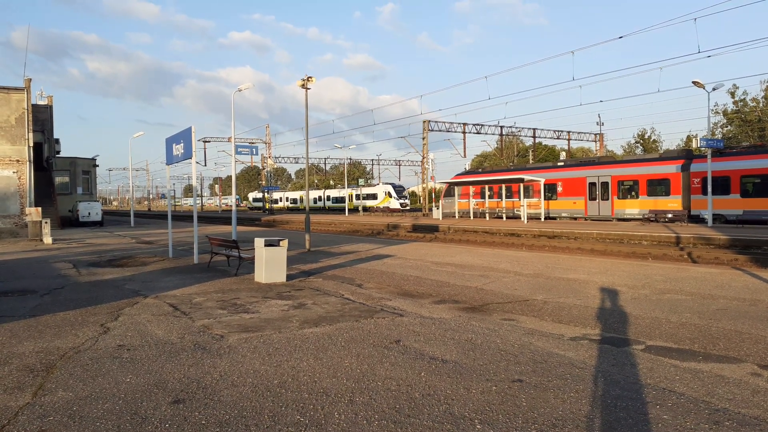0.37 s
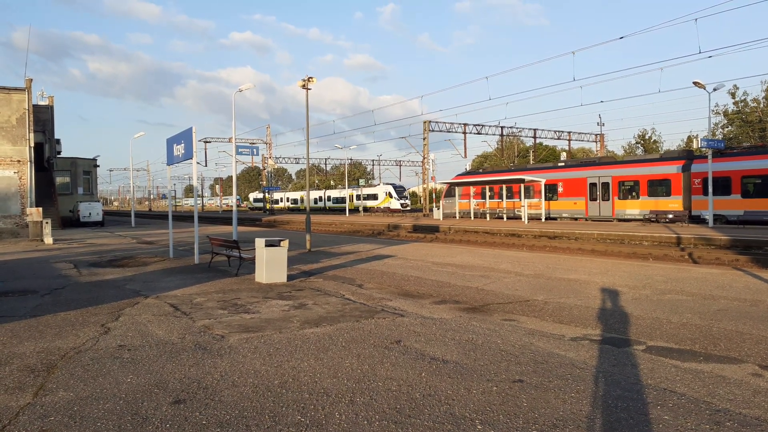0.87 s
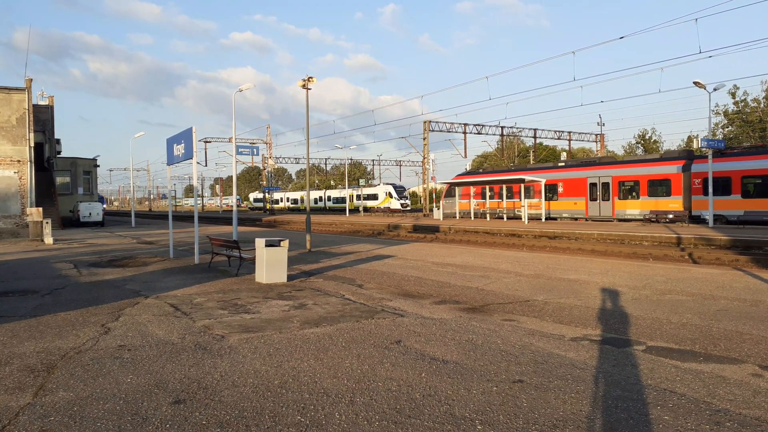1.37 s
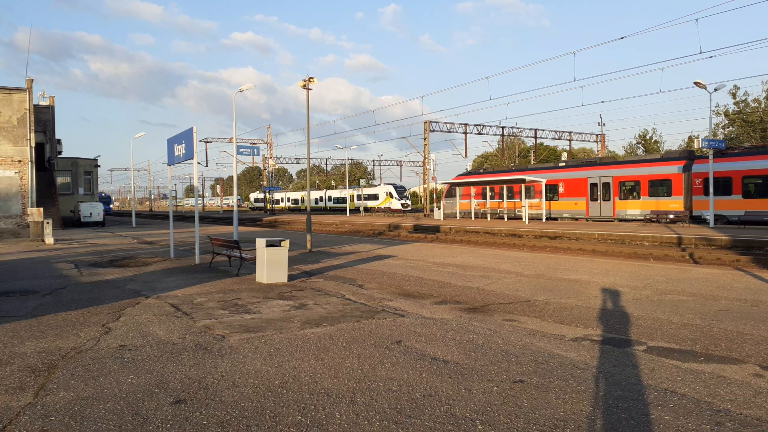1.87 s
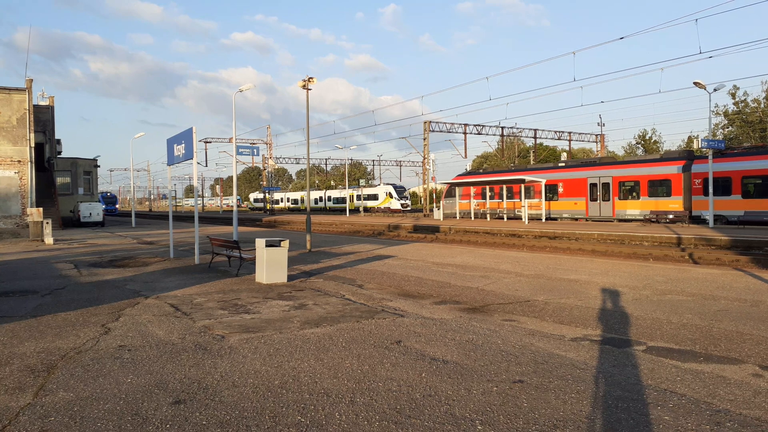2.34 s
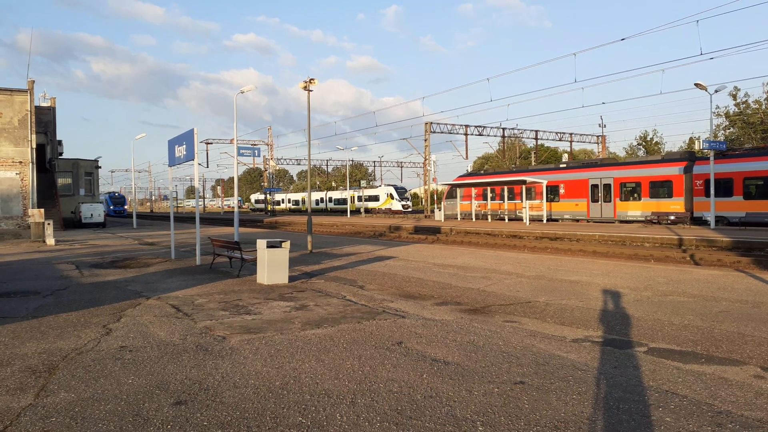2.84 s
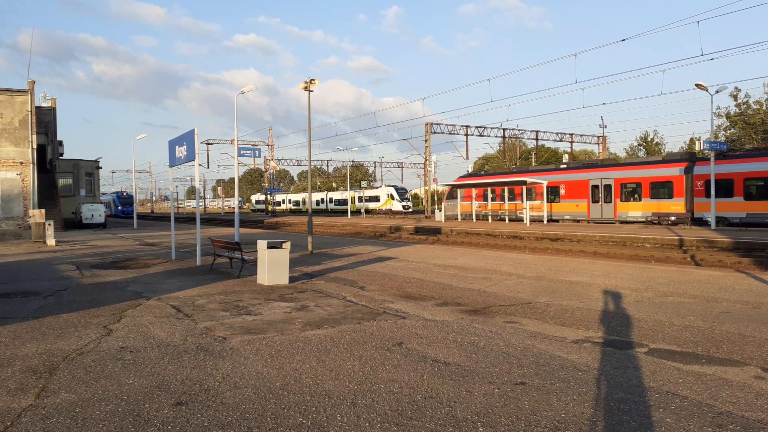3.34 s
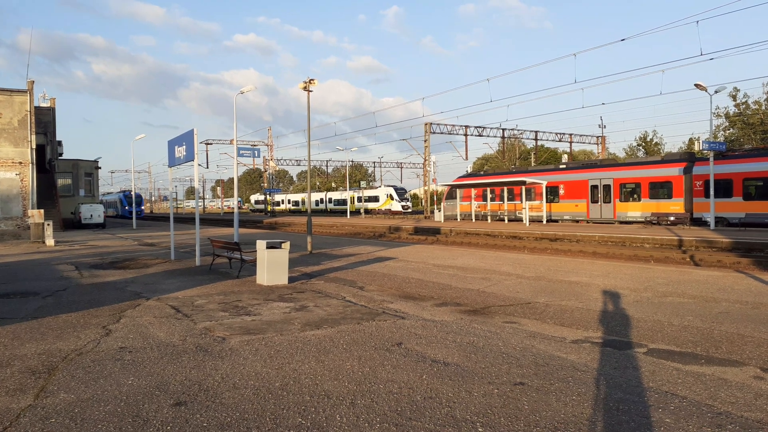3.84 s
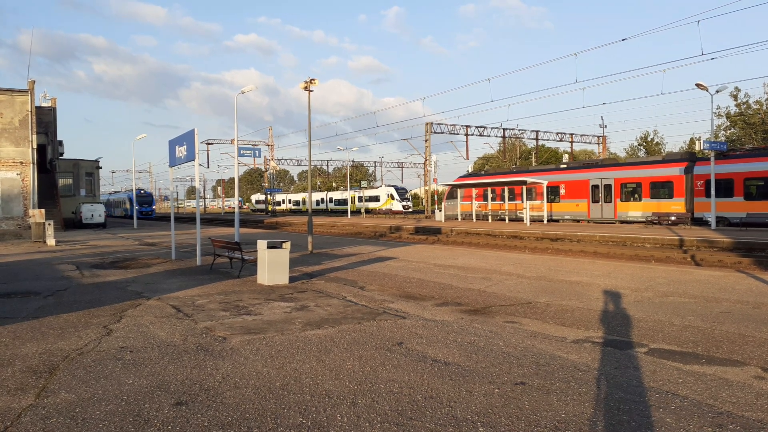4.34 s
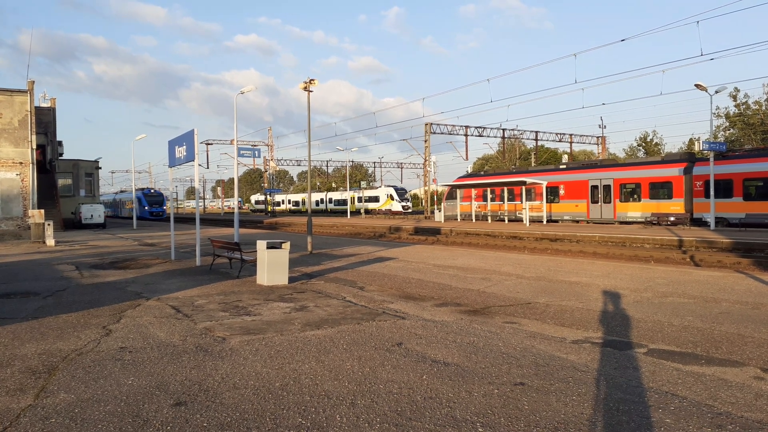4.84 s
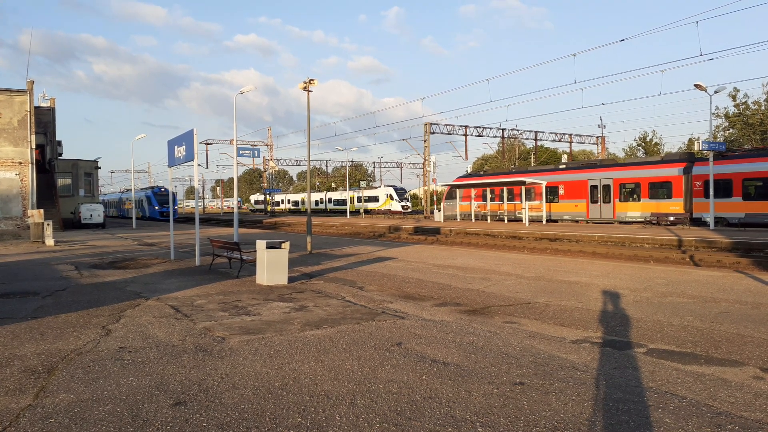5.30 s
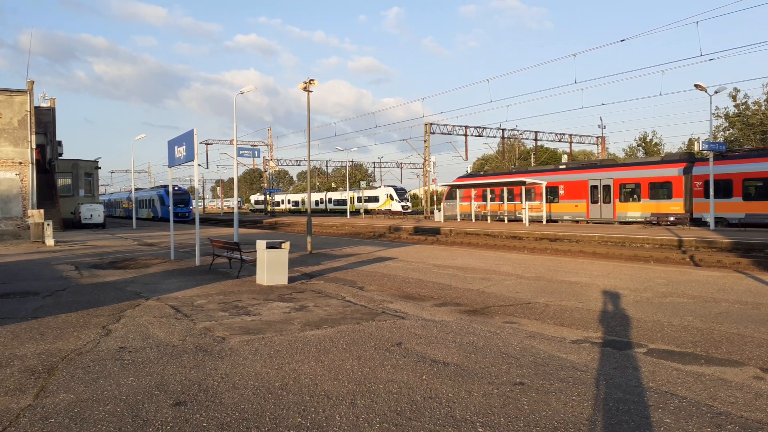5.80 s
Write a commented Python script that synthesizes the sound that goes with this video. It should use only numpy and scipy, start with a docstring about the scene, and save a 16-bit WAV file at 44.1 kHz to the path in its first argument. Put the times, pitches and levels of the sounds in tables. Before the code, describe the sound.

Swifts scream in buzzing trills over a windy station yard while a standing train hums and another brakes in the distance with a sinking whine.

```python
"""Swifts over a station yard

A standing train hums and its fans hiss on the right: wavering tone over banded noise. Another rolls in far off,
braking: a sinking, ever rougher motor whine over dull wheel noise. Gusts buffet the two microphone ports as low
turbulence and single wobbles. Small birds chip on the left in quick glides, with one longer rising swift call
near the end; a few dry ticks fall. Swifts scream overhead: buzzing whistles that break into trills, with echoes."""
import sys
import numpy as np
from scipy import signal
from scipy.io import wavfile

SR = 44100
rng = np.random.default_rng(int(sys.argv[2]) if len(sys.argv) > 2 else 0)


def pcm_store(signal):
    """Save signal as 16-bit PCM."""
    levels = np.round(np.clip(np.atleast_2d(signal), -1, 1) * 32767)
    wavfile.write(sys.argv[1], SR, levels.astype(np.int16).T)


N = 272538
STANDING_LAG_S = .00043   # the left port hears the standing train later


def from_db(db):
    """dB to gain."""
    return 10 ** (np.asarray(db) / 20)


def rms_one(x):
    """Scale to rms 1."""
    return x / np.sqrt(np.mean(x ** 2) + 1e-20)


def in_time(rows):
    """Columns of a curve table at every sample."""
    s, *columns = np.transpose(rows)
    return [np.interp(np.arange(N) / SR, s, c) for c in columns]


def at_hz(points, hz):
    """Read a spectrum on a log-frequency axis."""
    point_hz, value = np.transpose(points)
    return np.interp(np.log(hz), np.log(point_hz), value)


def band(x, low_hz, high_hz):
    """Butterworth band-pass."""
    return signal.sosfilt(signal.butter(2, [low_hz, high_hz], "band", fs=SR, output="sos"), x)


def drift(rate_hz):
    """Slow chance of spread 1: coarse noise twice through a one-pole low-pass."""
    r = np.exp(-80 * np.pi * rate_hz / SR)   # one coarse step is 40 samples
    slow = signal.lfilter([1], [1, -2 * r, r * r], rng.standard_normal(N // 40 + 2002))[2000:]
    return np.interp(np.arange(N) / 40, np.arange(len(slow)), rms_one(slow))


def sides(x, pan_db, lag_s=0):
    """Place sound between the ports: a level tilt, and the left one reading late."""
    x, n = x * np.ones((2, 1)), np.arange(N)
    left = np.interp(n - lag_s * SR, n, x[0])
    return np.array([left * from_db(pan_db / 2), x[1] * from_db(-pan_db / 2)])


def banded_noise(spectrum, likeness, edges, together_db, patchy_db, rate_hz):
    """Bands of stereo noise, each with its own level, flicker and likeness."""
    out = 0
    together = np.array([drift(rate_hz), drift(rate_hz)])   # one for each port
    white = rng.standard_normal((2, 2, N))
    for k, (low_hz, high_hz) in enumerate(zip(edges, edges[1:])):
        mid, side = band(white[k % 2], low_hz, high_hz)   # neighbouring bands use different noise
        hz = np.sqrt(low_hz * high_hz)
        alike = np.clip(at_hz(likeness, hz), 0, 1)
        pair = np.sqrt(1 + alike) * mid + np.sqrt(1 - alike) * side * [[1], [-1]]
        level_db = at_hz(spectrum, hz) + together_db * together + patchy_db * drift(rate_hz)
        out = out + from_db(level_db) * pair
    return out


def wavering(hz, width_hz, rough):
    """A tone whose steadiness is blurred by slow chance in level and phase; rms about 1 while rough is small."""
    turn = 2 * np.pi * np.cumsum(hz) / SR
    steady = (np.sqrt(2) + rough * drift(width_hz)) * np.sin(turn)
    return steady + rough * drift(width_hz) * np.cos(turn)


def walls(x):
    """Scattered echoes off buildings and carriages, other ones at each port."""
    out = np.zeros((2, N))
    lags = (rng.uniform(0.0019, 0.15, 28) * SR).astype(int)
    for k, lag in enumerate(lags):
        out[k % 2, lag:] += from_db(-170 * lag / SR) * x[:N - lag]   # later echoes are weaker, 170 dB per s
    return out


# Yard noise over time. Each row: time in seconds, level in dB before a half-dB lift, left minus right in dB.
YARD = [(0, -50, -2), (2.1, -50.5, -3.5), (2.5, -55.5, -1), (4.0, -51.5, -0.4), (5.2, -52, -0.8),
        (6.18, -49, 0)]
# Tone colour of the yard. Each row: frequency in Hz, relative density in dB per Hz.
YARD_COLOUR = [(35, -16), (60, -14), (140, -12), (300, -10.5), (450, -15), (800, -27.5), (1100, -25.5),
               (1400, -31), (2100, -33.5), (2750, -41.5), (3600, -44), (5200, -45), (7000, -56),
               (8500, -57), (10500, -69), (15700, -65)]
# How alike the ports hear the yard. Each row: frequency in Hz, likeness from 0 to 1.
YARD_LIKENESS = [(100, 1), (2000, 0.23), (12000, 0.05)]


def yard():
    """Fans, vents and far traffic: smooth broad noise, levelled on its middle band."""
    level_db, pan_db = in_time(YARD)
    edges_hz = 28.4 * 2 ** np.arange(0, 9.3, .4)
    noise = banded_noise(YARD_COLOUR, YARD_LIKENESS, edges_hz, together_db=0.8, patchy_db=1.6, rate_hz=10.8)
    noise = noise / np.std(band(noise, 1400, 3500))
    return sides(from_db(level_db + 0.5) * noise, pan_db, STANDING_LAG_S)


# Level of the hum. Each row: time in seconds, level in dB before the slight tilt to the right.
HUM = [(0, -35.5), (1.0, -33.5), (1.65, -38), (2.1, -35.5), (3.45, -39), (4.1, -34.5), (5.25, -39),
       (5.85, -34), (6.18, -35.5)]


def hum():
    """A converter hum of the standing train: one low tone, slightly unsteady."""
    tone = wavering(np.full(N, 324.5), width_hz=7.0, rough=.25)
    return sides(from_db(in_time(HUM)[0]) * tone, -1.0, STANDING_LAG_S)


# Wind beneath the gusts, rising over the first second and then holding. Each row: time in seconds,
# left level in dB, right level in dB.
BREEZE = [(0, -75, -52), (1.2, -35.5, -34.5), (3.0, -34.5, -34), (6.18, -35.5, -33.5)]
# Gusts on the ports. Each row: start of the hold in seconds, hold in seconds, left level in dB, right level in dB.
GUSTS = [(1.313, 0.29, -19.5, -34), (1.698, 0.15, -27, -39), (1.909, 0.04, -23.5, -22.5),
         (2.051, 0.15, -16.5, -42), (2.247, 0.035, -25, -16), (3.56, 0.076, -27, -23),
         (3.719, 0.011, -25.5, -18.5), (3.818, 0.17, -28, -29), (4.235, 0.068, -24, -22.5),
         (4.395, 0.039, -26.5, -33), (5.122, 0.022, -28, -26.5), (5.653, 0.054, -27, -26.5),
         (5.875, 0.014, -26.5, -22.5)]


def wind_db():
    """The breeze, overtopped by gusts that rise fast, hold and fall."""
    rise_db_per_s, fall_db_per_s = 403.5, 254
    t, level_db = np.arange(N) / SR, np.array(in_time(BREEZE))
    for s, hold_s, left_db, right_db in GUSTS:
        before_s, after_s = np.maximum(s - t, 0), np.maximum(t - s - hold_s, 0)
        under_db = rise_db_per_s * before_s + fall_db_per_s * after_s
        level_db = np.maximum(level_db, np.array([[left_db], [right_db]]) - under_db)
    return level_db


# Tone colour of the turbulence. Each row: frequency in Hz, relative density in dB per Hz.
WIND_COLOUR = [(35, -13), (70, -4.5), (105, 0.5), (150, -7.5), (340, -10.5), (500, -36)]
# Single puffs on the ports. Each row: centre in seconds, left drive in dB, right drive in dB, spread in ms,
# wobble in Hz.
PUFFS = [(1.917, -12.5, -49, 0.54, 367), (2.181, -9.5, -35, 0.48, 400), (2.208, 2.5, -54, 0.94, 375),
         (3.35, -50, -12, 1, 416), (3.62, -18.5, -22, 9.0, 330), (3.665, -22.5, -23.5, 6.4, 327),
         (3.72, -14.5, -14, 3.8, 300), (3.843, -17, -29, 7.4, 341), (4.27, -8, -15, 6.1, 349.5),
         (4.311, -20, -19, 6.2, 316)]


def wind():
    """Lumpy low turbulence, mostly its own at each port, plus single eddies that make a port wobble."""
    edges_hz = 30 * 2 ** np.arange(0, 4.1, .33)
    lumps = banded_noise(WIND_COLOUR, [(50, 0.16)], edges_hz, together_db=2.5, patchy_db=4.0, rate_hz=19.5)
    lumps = signal.sosfilt(signal.butter(6, 470, fs=SR, output="sos"), lumps)
    out = from_db(wind_db()) * rms_one(lumps)
    t = np.arange(-1000, 1000) / SR
    soften = signal.butter(4, 1100, fs=SR, output="sos")
    for s, left_db, right_db, spread_ms, hz in PUFFS:
        swell = np.exp(-np.abs(1000 * t / spread_ms) ** 1.4)
        wobble = swell * np.sin(2 * np.pi * hz * t + .5)
        # a snap over at its height
        wobble += 0.1 / (1 + spread_ms) * np.exp(-np.abs(t) / 0.0006) * np.sign(t)
        puff = from_db([[left_db], [right_db]]) * signal.sosfiltfilt(soften, wobble)
        centre = round(s * SR)
        out[:, centre - 1000:centre + 1000] += puff
    return out


# Level of the motor whine. Each row: time in seconds, level in dB, around which it flickers more and more.
WHINE = [(0, -64), (1.75, -59), (2.3, -63), (2.62, -70), (2.69, -50.5), (2.85, -49), (2.92, -64),
         (3.15, -66), (3.2, -52.5), (3.27, -68), (3.52, -66), (3.58, -53), (4.4, -52.5), (5.55, -57),
         (6.18, -54)]
# Braking lowers the motor pitch, then eases. Each row: time in seconds, pitch in Hz, around which it wanders.
WHINE_PITCH = [(0, 1260), (2.75, 1119), (4.1, 1038), (4.5, 1005), (6.18, 947)]


def arrival():
    """A motor whine comes and goes; a rough haze just below it and dull wheel noise grow as the train nears."""
    t = np.arange(N) / SR
    hz = in_time(WHINE_PITCH)[0] + 2 * t * drift(3.0)
    haze = from_db(-17 + 2 * t) * wavering(.97 * hz, width_hz=45.0, rough=2.2)   # grows against the whine
    whine = wavering(hz, width_hz=12.0, rough=.12 * t) + haze
    whine_db = in_time(WHINE)[0] + 2 * drift(4.1) * t / 4   # the whine swells and sinks on its way
    wheels = rms_one(band(rng.standard_normal(N), 300, 1000))
    wheels_db = -70.5 + 4.5 * t
    train = from_db(whine_db) * whine + from_db(wheels_db) * wheels
    return sides(train, 0, lag_s=-0.00023)   # the left port hears it first


# Light dry ticks. Each row: start in seconds, peak in dB midway between the ports, left minus right in dB.
TICKS = [(3.853, -32, 4), (3.906, -27, 10), (4.271, -25, 8), (4.289, -33, 4)]


def ticks():
    """Dull mid-band clicks: a band-passed impulse with a short gritty tail."""
    tail_s, grit_share, low_hz, high_hz = .006, .14, 350, 1300
    out, u = np.zeros((2, N)), np.arange(400) / SR
    for s, level_db, pan_db in TICKS:
        grit = rng.standard_normal(400)
        click = (u == 0) + grit_share * grit * np.exp(-u / tail_s)
        burst = band(band(click, low_hz, high_hz), low_hz, high_hz)
        burst = burst / np.abs(burst).max()
        gains = from_db([[level_db + pan_db / 2], [level_db - pan_db / 2]])
        out[:, round(s * SR):][:, :len(u)] += gains * burst
    return out


# Short bird glides: small-bird chips, and one longer rising swift call near the end. Each row: start in seconds,
# length in seconds, first pitch in Hz, last pitch in Hz, peak in dB before placing.
GLIDES = [(.26, .04, 8900, 6500, -66), (.91, .08, 7000, 6100, -66), (1.26, .16, 7600, 5000, -64.5),
          (3.3, 0.032, 7400, 6200, -66), (4.05, .03, 6900, 6750, -63), (4.2, .015, 6600, 7900, -65),
          (4.235, .03, 6500, 8640, -64), (4.313, 0.046, 8150, 8800, -65), (4.36, .02, 6600, 6500, -63),
          (4.39, .035, 7500, 6400, -63), (4.505, 0.02, 7100, 5900, -65), (4.645, .015, 7900, 6500, -64),
          (5.645, .19, 5220, 6200, -61)]


def bird_glides():
    """Short bird glides: small-bird chips, one longer rising swift call, and a fainter twitter at random."""
    out = np.zeros(N)
    at, long, high, glide = rng.random((55, 4)).T
    level_db = np.full(len(at), -67.5)
    twitter = np.transpose([6 * at, 0.008 + 0.012 * long, 6500 + 1800 * high ** 2, 6300 + 1500 * glide, level_db])
    for rows in (GLIDES, twitter):
        for s, length_s, from_hz, to_hz, peak_db in rows:
            u = np.linspace(0, 1, round(length_s * SR))
            turn = 2 * np.pi * np.cumsum(from_hz + (to_hz - from_hz) * u ** 0.82) / SR
            out[round(s * SR):][:len(u)] += from_db(peak_db) * np.sin(np.pi * u) * np.sin(turn)
    return out


# Swift screams. Each row: start in seconds, slide-up time in seconds, slide-up in Hz, trill start in seconds,
# end in seconds, whistle in Hz, full buzz swing in Hz, whistle level in dB, trill level in dB;
# pitch and levels are centres that the voice moves around.
SCREAMS = [(.03, .05, 1000, .27, .42, 5950, 350, -57.5, -52),
           (.76, .04, 600, .97, 1.1, 6000, 300, -57, -59),
           (1.097, .036, 950, 1.392, 1.56, 5770, 60, -54.5, -56.5),
           (1.655, .035, 1000, 1.962, 2.11, 6020, 340, -53.5, -49),
           (2.045, .07, 900, 2.185, 2.31, 5700, 200, -55.5, -51.5),
           (2.265, .032, 1100, 2.535, 2.66, 6240, 110, -57, -58),
           (3.36, .05, 1300, 3.659, 3.83, 6150, 330, -54, -47.5),
           (4.07, .02, 400, 4.24, 4.26, 5100, 500, -59, -60),
           (4.47, .065, 1400, 4.76, 4.93, 5800, 430, -53, -48),
           (5.385, .015, 300, 5.56, 5.65, 5730, 300, -56, -56)]


def swifts():
    """A whistle near 6 kHz that a fast buzz roughens more and more, then broken into short rising notes."""
    rest_hz, trill_top = 5760, .3   # resting pitch; share of the trill at which it arches over
    out = np.zeros(N)
    for start_s, slide_s, scoop_hz, trill_s, end_s, whistle_hz, swing_hz, level_db, trill_db in SCREAMS:
        n = np.arange(round(start_s * SR), round(end_s * SR))
        t = n / SR
        beat = (t - trill_s) * 37.5 % 1   # 37.5 notes per s
        trilling = t > trill_s
        whistled = (t - start_s) / (trill_s - start_s)
        grown = np.clip(whistled, 0, 1)
        spent = np.clip((t - trill_s) / (end_s - trill_s), 0, 1)
        buzz = np.sin(2 * np.pi * np.cumsum(290 * (1 + 0.11 * drift(25.0)[n])) / SR)

        sag_hz = .5 * max(whistle_hz - rest_hz, 0) * whistled ** 2   # a high scream sags toward rest
        slide_hz = whistle_hz - scoop_hz * np.exp((start_s - t) / slide_s) - sag_hz
        # the harder the buzz, the higher the trill; it arches over early and falls away
        trill_hz = .9 * swing_hz - 1900 * (spent - trill_top) ** 2 + 380 * (beat - .5)
        buzz_hz = swing_hz * (.25 + .75 * grown) * buzz
        jitter_hz = (10 + .07 * swing_hz) * drift(82.0)[n] + .15 * swing_hz * drift(12.0)[n]
        hz = slide_hz + np.where(trilling, trill_hz, buzz_hz) + jitter_hz

        note_shape = np.sin(np.pi * np.clip(beat / 0.86, 0, 1)) ** 2
        notes = from_db(trill_db - 14 * (spent - trill_top) ** 2) * note_shape
        # loudest early, spread thin as the buzz grows
        whistle = from_db(level_db + .02 * swing_hz * (.5 - grown)) * (1 + 0.2 * buzz)
        swell = (t - start_s) / (.0001 * swing_hz)   # a buzzier scream swells in more slowly
        fade = np.clip(np.minimum(swell, (end_s - t) / 0.022), 0, 1) ** 1.5
        turn = 2 * np.pi * np.cumsum(hz) / SR
        voice = np.sin(turn) + from_db(-19) * np.sin(2 * turn)
        flicker = from_db(1.6 * drift(27.0)[n])
        out[n] += flicker * np.where(trilling, notes, whistle) * fade * voice
    return out


def scene():
    """All sources at the two ports, the birds with their echoes."""
    screams, glides = swifts(), bird_glides()
    echoes = from_db(-11) * walls(screams + glides)
    birds = sides(screams, -1.4, lag_s=.00004) + sides(glides, 2.0) + echoes
    return yard() + hum() + wind() + arrival() + ticks() + birds


def cap(x):
    """Peaks bend over into full scale."""
    return x / (1 + x ** 8) ** .125


# The low end drops briefly. Each row: centre in seconds, spread in seconds, left drop in dB, right drop in dB.
DIPS = [(2.569, 0.019, 9, 33), (3.412, 0.098, 3.5, 11), (3.768, 0.024, 13, 30), (4.468, 0.02, 3, 19),
        (5.923, 0.012, 30, 12.5)]


def dip_lows(ports):
    """Draw the part below 500 Hz down in bell-shaped moments, by its own amount at each port."""
    t = np.arange(N) / SR
    dip_db = 0
    for s, spread_s, left_db, right_db in DIPS:
        dip_db = dip_db + np.array([[left_db], [right_db]]) * np.exp(-((t - s) / spread_s) ** 2)
    low = signal.sosfiltfilt(signal.butter(2, 500, fs=SR, output="sos"), ports)
    return ports - low * (1 - from_db(-dip_db))


def top_cut(x):
    """Nothing passes above the cut-off."""
    return signal.sosfilt(signal.butter(12, 15740, fs=SR, output="sos"), x)


def record(dry):
    """The right port is dull around 8 kHz, the deepest bass is cut, the lows dip at moments, peaks are capped."""
    hole = signal.sosfilt(signal.butter(1, [6600, 11500], "band", fs=SR, output="sos"), dry)
    ports = dry - [[0], [.82]] * hole
    ports = signal.sosfilt(signal.butter(2, 42, "high", fs=SR, output="sos"), ports)
    finished = cap(dip_lows(ports))
    return top_cut(finished)


dry = scene()
out = record(dry)
pcm_store(out)
```